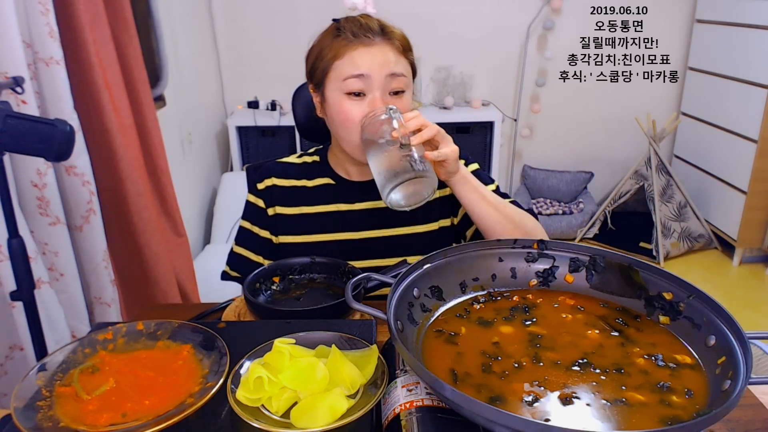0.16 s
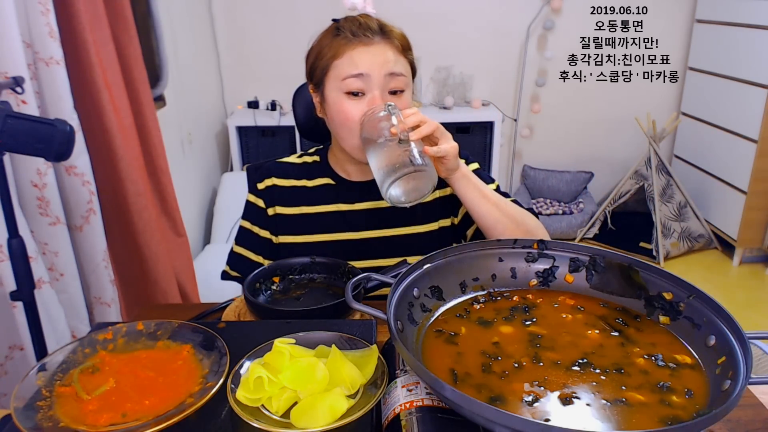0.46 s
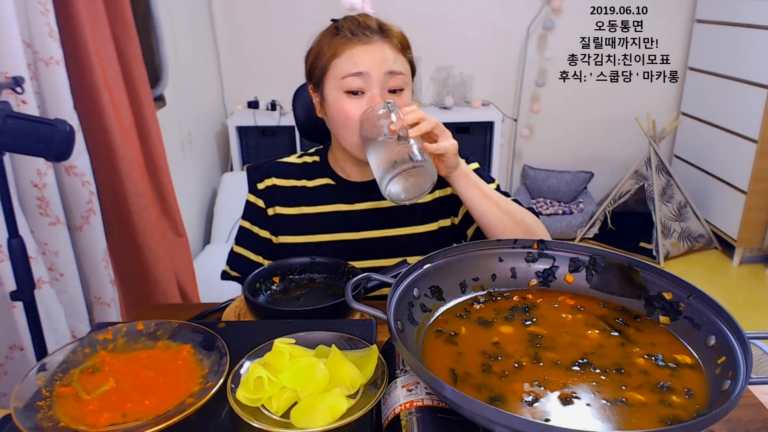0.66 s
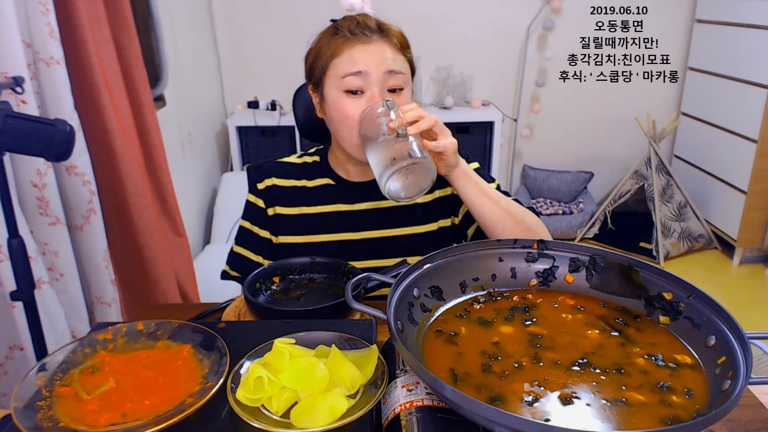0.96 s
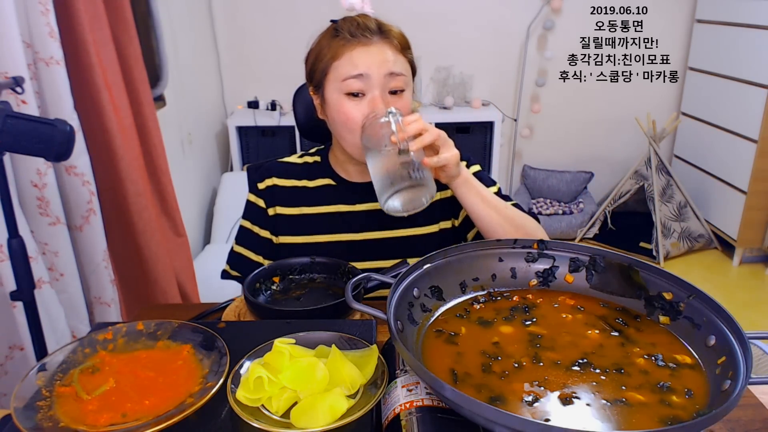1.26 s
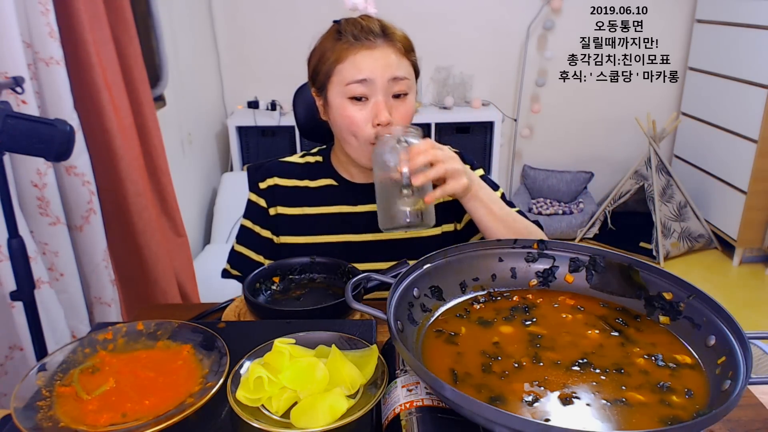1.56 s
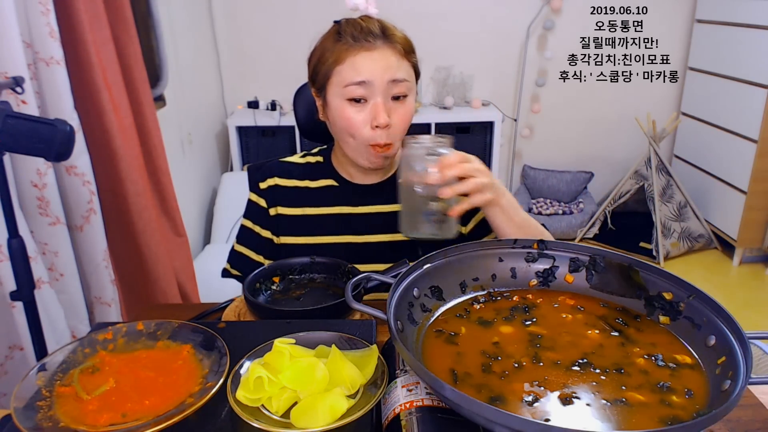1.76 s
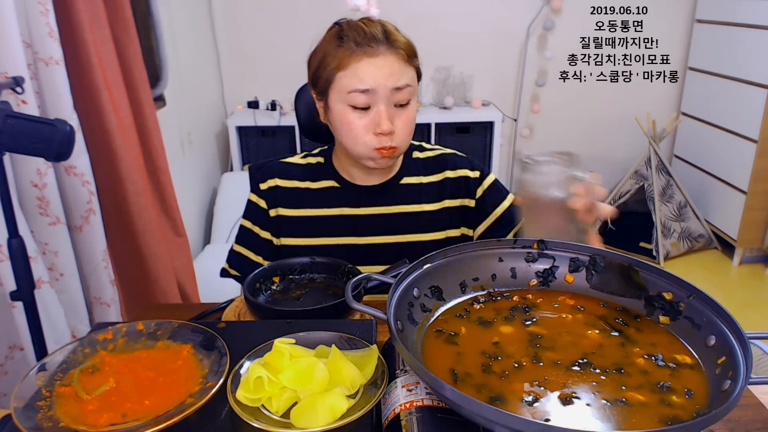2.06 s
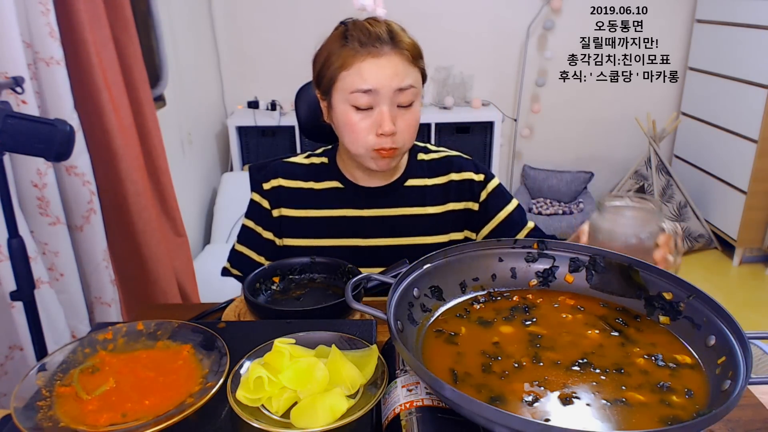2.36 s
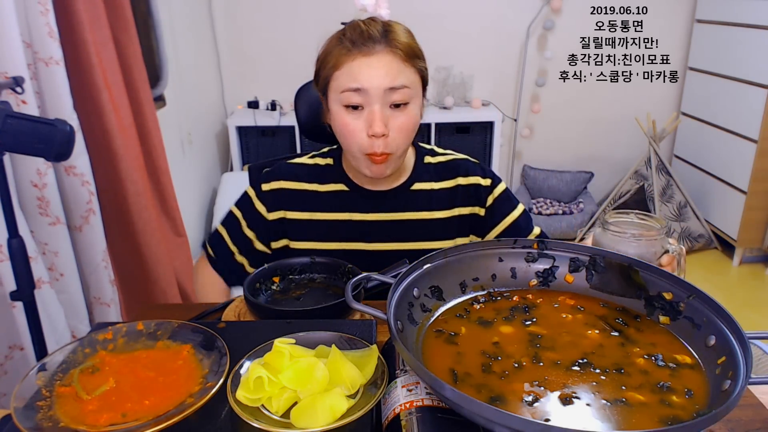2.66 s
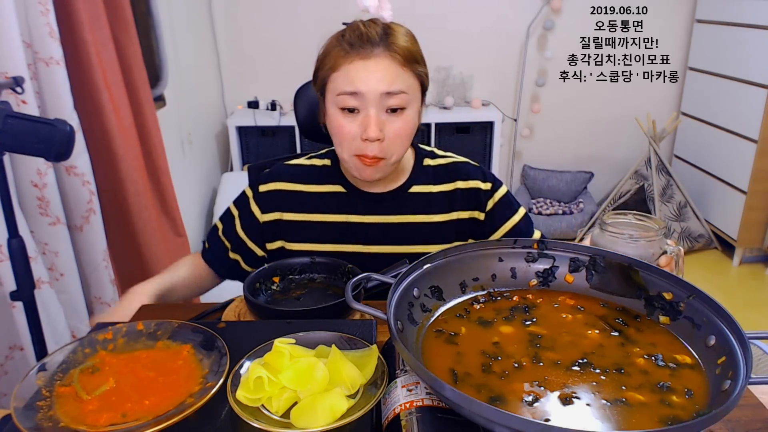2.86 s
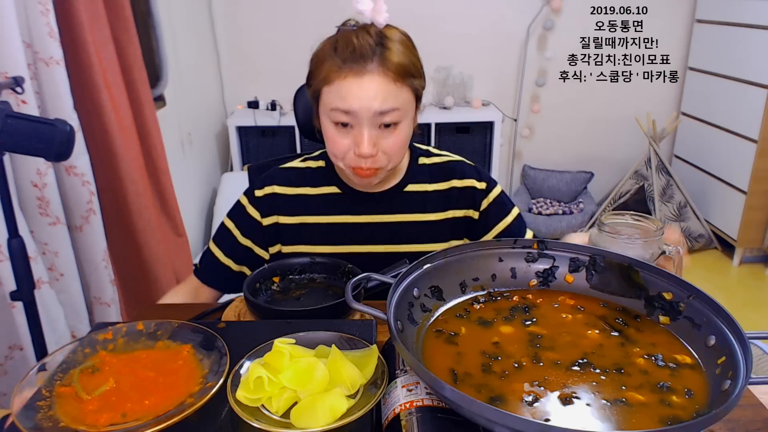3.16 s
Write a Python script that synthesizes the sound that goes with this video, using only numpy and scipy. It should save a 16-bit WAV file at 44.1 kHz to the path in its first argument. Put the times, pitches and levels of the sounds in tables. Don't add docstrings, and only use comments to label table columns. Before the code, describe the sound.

A glass mug holding ice, close and almost mono in a quiet small room with hiss and low fan hum. Ice cracks and slush shift at 0.2-0.45 s, then sparse faint ticks. Light clinks return at 1.2-1.6 s, brighter ones at 1.8-2.3 s. At 2.53 s the mug hits a wooden table, loud and booming with rattle, rocks at 2.67, then scrapes briefly at 2.75-3.1 with last small clinks.

```python
import sys
import numpy as np
from scipy import signal
from scipy.fft import rfft, irfft
from scipy.io import wavfile

SR = 44100
rng = np.random.default_rng(int(sys.argv[2]) if len(sys.argv) > 2 else 0)


def wrap_up_sound(samples):
    columns = np.atleast_2d(samples).T
    tamed = np.clip(columns, -1, 1)
    steps = np.round(tamed * 32767).astype(np.int16)
    wavfile.write(sys.argv[1], SR, steps)


def boost(x):
    u = np.asarray(x, float) / 20
    return 10 ** u


N = 145530

# pitch_hz, level_db per Hz
HISS_COLOUR = [(200, -53), (350, -3), (850, 2), (1700, -6), (3300, -9), (4800, -17), (6800, -16),
               (16000, -27.5)]
# pitch_hz, width_hz, level_db
FAN_HUMS = [(44.8, 5.8, -62.5), (135, 66, -66.5), (266.7, 26, -65), (311, 6.7, -67.5)]
# pitch_hz, time to fall 60 dB t60_s
ROOM_T60 = [(200, 0.42), (2000, 0.31), (10000, 0.18)]

# start_s, length_s, level_db
DRAGS = [
    (2.74, 0.38, -55),
    (2.778, 0.06, -62),
    (2.816, 0.008, -40.5),
    (2.823, 0.022, -37),
    (2.858, 0.01, -44),
    (2.867, 0.047, -41),
    (2.919, 0.016, -39),
    (2.94, 0.037, -54),
    (3.005, 0.073, -49.5),
]
# pitch_hz, level_db
DRAG_COLOUR = [(300, -18), (1140, -5.5), (1600, -14), (3000, -15.5), (4200, -23), (5100, -15.5),
               (6800, -18.5), (16000, -38)]

# start_s, level_db, dullness_db_per_khz, free ringing share (0 to 1)
KNOCKS = [
    (2.532, -1.5, 0, 1),
    (2.571, -14, -3, 0.35),
    (2.668, -11, -10, 0.49),
]
# start_s, level_db
BLOWS = [
    (2.5326, -.2),
    (2.5381, -7),
    (2.5413, -11),
    (2.668, -25),
]
TABLE_HZ = [76, 214, 262, 392, 430, 508, 581, 689, 815, 927, 1136, 1278, 1610, 2470]
# level_db, t60_s
TABLE_RINGS = [(-29.5, 0.2), (-29, 0.54), (-18.5, 0.11), (-27, 0.41), (-38.5, 0.65), (-20, 0.23),
               (-22, 0.23), (-29, 0.18), (-27, 0.3), (-37, 0.38), (-16.5, 0.13), (-10.5, 0.067),
               (-7, 0.029), (-34, 0.12)]
# pitch_hz, level_db per Hz
RATTLE_COLOUR = [(59, -54), (200, -13), (600, 3.5), (800, -4), (1600, -14), (3800, -32.5), (8000, -40),
                 (16000, -47)]
# pitch_hz, t60_s
RATTLE_T60 = [(100, 0.96), (500, 0.13), (2000, 0.23), (8000, 0.19)]

# start_s, level_db, pitch_hz, t60_s
CRACKS = [(.191, -28, 2640, .03), (.206, -22.5, 2600, 0.026), (.208, -14, 9260, 0.013),
          (.208, -23.5, 10500, 0.016), (.208, -16.5, 6940, 0.009), (.217, -23.5, 9420, 0.023),
          (.221, -29.5, 3160, 0.04), (.225, -39, 810, 0.027), (.242, -33, 760, 0.043),
          (0.251, -19, 6340, 0.017), (0.253, -22, 7590, 0.046), (.276, -19.5, 6350, 0.013),
          (1.226, -31, 2210, 0.026), (2.668, -26.5, 720, 0.058), (.955, -38, 2360, 0.076),
          (1.697, -40, 9600, 0.018), (1.697, -38, 6550, 0.017), (2.542, -34.5, 5150, 0.2),
          (1.758, -40, 6430, .02), (1.816, -22.5, 1050, 0.0062), (2.285, -30.5, 1010, 0.021),
          (3.019, -46, 7540, 0.017), (1.558, -44, 4120, 0.13), (1.5722, -44, 4220, 0.094),
          (1.89, -45.5, 4170, .05), (1.994, -42.5, 4100, 0.064), (1.612, -46, 2850, .02),
          (2.286, -42, 5900, 0.016), (2.285, -41, 2800, .015), (2.779, -34, 1112, 0.085),
          (2.817, -28.5, 1150, 0.024), (2.955, -42, 700, 0.051), (0.192, -36.5, 1015, 0.025),
          (0.205, -32, 1130, 0.025), (1.1444, -43, 3550, .03), (1.1444, -46, 7100, 0.04),
          (2.757, -34.5, 1300, 0.014), (3.017, -52, 5600, 0.013), (3.023, -47, 5400, 0.011),
          (3.029, -43, 6100, 0.011), (3.038, -43, 5560, 0.01), (3.05, -51, 5260, .012),
          (0.234, -39, 1800, 0.039), (.262, -30, 825, 0.017), (0.259, -34.5, 2790, 0.034)]
# start_s, length_s, level_db
SLUSH = [
    (.19, 0.17, -43.5),
]
# pitch_hz, level_db per Hz
SLUSH_COLOUR = [(180, -54), (300, -11), (774, -0.5), (1300, -4), (2650, -3.5), (4230, -11), (6300, -8.5),
                (16000, -15)]
# start_s, length_s, level_db
FIZZ = [
    (.335, 0.11, -56.5),
    (.387, 0.039, -48.5),
    (.422, 0.02, -49),
]

# start_s, first_ring_db, second_ring_db, high_rings_db
CLINKS_TIPPED = [(0.1727, -52.5, -69, -61), (0.191, -40, -37, -45), (0.2055, -36, -58, -45),
                 (0.274, -43, -42, -53), (0.304, -56, -63, -60), (0.3378, -46.5, -55, -52),
                 (0.3537, -52, -63, -46), (0.3697, -51, -55, -50), (0.3876, -47, -42, -60),
                 (0.4214, -51, -53, -53), (0.437, -47, -65, -65), (0.5164, -48.5, -77, -67),
                 (0.5565, -48, -66, -69), (.6635, -53, -66, -60), (.9363, -59, -43, -64),
                 (1.07, -49.5, -44, -58), (1.1444, -54, -49, -60), (1.2274, -43, -38, -49),
                 (1.28, -48.5, -41, -51), (1.3053, -47, -66, -67), (1.3264, -67, -47, -55),
                 (1.3625, -29.5, -35, -47), (1.3859, -40, -56, -56), (1.396, -40.5, -63, -64),
                 (1.4139, -45, -58, -59), (1.4435, -53, -60, -63), (1.479, -33, -41, -50),
                 (1.5378, -42, -47, -50.5), (1.5714, -49, -43, -50), (1.6295, -52.5, -46, -66)]
# start_s, first_ring_db, second_ring_db, high_rings_db
CLINKS_UPRIGHT = [(1.8053, -32, -38, -38), (1.826, -36, -57, -59), (1.8385, -39, -52, -58),
                  (1.8464, -40, -48, -65), (1.8834, -53, -43, -52), (1.921, -58, -62, -67),
                  (1.9445, -47, -54.5, -54), (1.9869, -45.5, -53, -51.5), (2.1236, -29, -24, -48),
                  (2.1544, -49, -46, -54), (2.1774, -47.5, -43, -56), (2.198, -58, -60, -52.5),
                  (2.2109, -34, -33.5, -48.5), (2.2408, -38.5, -47, -60), (2.2644, -42.5, -56, -54),
                  (2.507, -61, -71, -55), (2.5174, -50.5, -64, -66), (2.6234, -45, -60, -57.5),
                  (3.02, -40, -52, -62), (3.0784, -37.5, -42.5, -56.5), (3.1044, -49, -63, -72)]
# start_s, pitch_hz
TILT = [(0, 1810), (1.3, 1858), (1.37, 1916), (1.47, 1826), (1.85, 1869), (2.1, 1910), (3.3, 1930)]
# pitch_hz, level_db, t60_s
FIRST_RINGS = [(1930, 2, 0.067), (1974, -3.5, 0.021), (2530, -6.5, 0.016), (2784, -6, 0.014)]
# pitch_hz, level_db, t60_s
SECOND_RINGS = [(3564, -2, .055), (3640, -17, .04), (3865, -21, .05), (4200, -22, .07), (2820, -22, .05)]
# pitch_hz, level_db, t60_s
HIGH_RINGS = [(6550, 2.5, 0.017), (6170, -3.5, 0.022), (7560, -10, 0.019), (10500, -13, 0.028),
              (5400, -8, 0.016)]
RING_DB = [0, 6.5, 4.5]
SCATTER_DB = [4.5, 1, 4]


def evened(x):
    return x / np.sqrt(np.mean(x ** 2) + 1e-20)


def read(points, hz):
    f, value = np.transpose(points)
    return np.interp(np.log(hz + 1), np.log(f + 1), value)


def add(mix, s, sound):
    part = mix[round(s * SR):][:len(sound)]
    part += sound[:len(part)]


def colour(x, points):
    hz = np.fft.rfftfreq(len(x), 1 / SR)
    return evened(irfft(rfft(x) * boost(read(points, hz)), len(x)))


def ring(hz, db, t60, rise_s=0.00014):
    t = np.arange(SR // 2) / SR
    return boost(db - 60 * t / t60) * (1 - np.exp(-t / rise_s)) * np.sin(2 * np.pi * hz * t)


def fuzzy(hz, width, x):
    r = np.exp(-np.pi * width / SR)
    return evened(signal.lfilter([1, 0, -1], [1, -2 * r * np.cos(2 * np.pi * hz / SR), r * r], x))


def tail(t60s, x):
    hz, t, bands = signal.stft(x, SR, nperseg=128)
    decay = boost(-60 * t / read(t60s, hz)[:, None])
    return signal.istft(bands * decay, SR, nperseg=128)[1]


def bursts(rows, grit):
    out = np.zeros(N)
    for s, length, db in rows:
        u = np.arange(0, length, 1 / SR) / length
        stroke = np.sin(np.pi * u ** 0.41) ** 2
        add(out, s, boost(db) * stroke * grit[round(s * SR):][:len(u)])
    return out


def air():
    out = boost(-55.5) * colour(rng.standard_normal(N), HISS_COLOUR)
    for hz, width, db in FAN_HUMS:
        out = out + boost(db) * fuzzy(hz, width, rng.standard_normal(N))
    whine_hz, whine_db = 11220, -77
    drift = np.cumsum(rng.standard_normal(N)) / 50
    return out + boost(whine_db) * np.sin(2 * np.pi * whine_hz * np.arange(N) / SR + drift)


def room(x):
    echoes = np.zeros(SR // 2)
    at = np.arange(200, SR // 2 - 20, 20)
    echoes[at + rng.integers(0, 20, len(at))] = rng.choice([-1., 1.], len(at))
    decay = tail(ROOM_T60, echoes)
    return signal.fftconvolve(x, decay / np.linalg.norm(decay))[:N]


def drags():
    slips_per_s = 1100
    slips = rng.standard_normal(N) * (1 + 4 * (rng.random(N) < slips_per_s / SR))
    wood = fuzzy(1130, 37, slips)
    return bursts(DRAGS, colour(slips, DRAG_COLOUR) + boost(-15) * wood)


def blows():
    blow_hz, blow_s, sag_s = 1250, 0.0008, 0.0018
    t = np.arange(441) / SR
    swell = (t / blow_s * np.exp(1 - t / blow_s)) ** 2
    blow = swell * np.sin(2 * np.pi * blow_hz * sag_s * (1 - np.exp(-t / sag_s)))
    out = np.zeros(N)
    for s, db in BLOWS:
        add(out, s, boost(db) * blow)
    return out


def shaken_table():
    out, rise_s, rattle_db = np.zeros(N), 0.003, -15
    for s, db, dull_db, free in KNOCKS:
        for k, (hz, (mode_db, t60)) in enumerate(zip(TABLE_HZ, TABLE_RINGS)):
            tone = ring(hz, db + mode_db + dull_db * hz / 1000, t60 * free, rise_s=rise_s)
            add(out, s, (-1) ** k * tone)
        shake = [(hz, level + dull_db * hz / 1000) for hz, level in RATTLE_COLOUR]
        t60s = [(hz, t60 * free) for hz, t60 in RATTLE_T60]
        rattle = tail(t60s, colour(rng.standard_normal(SR // 2), shake))
        rise = 1 - np.exp(-np.arange(len(rattle)) / SR / rise_s)
        add(out, s, boost(db + rattle_db) * rattle * rise)
    return out


def cracks():
    out = np.zeros(N)
    for (s, db, hz, t60), luck in zip(CRACKS, rng.standard_normal((len(CRACKS), 3))):
        for z in luck:
            add(out, s, ring(hz * (1 + 0.0212 * z), db - 13.5, t60, rise_s=0.000087))
    grains = boost(1.5 * rng.exponential(1, N // 40 + 1)).repeat(40)[:N]
    grit = rng.standard_normal(N) * grains
    slush = bursts(SLUSH, colour(grit, SLUSH_COLOUR))
    fizz = bursts(FIZZ, fuzzy(12500, 1400, grit))
    return out + slush + fizz


def clinks():
    out, rows = np.zeros(N), CLINKS_TIPPED + CLINKS_UPRIGHT
    groups = (FIRST_RINGS, SECOND_RINGS, HIGH_RINGS)
    modes = [(g, *mode) for g, group in enumerate(groups) for mode in group]
    luck_rows = rng.standard_normal((len(rows), len(modes) + 2048))
    for (s, *dbs), luck in zip(rows, luck_rows):
        water_shift = np.interp(s, *np.transpose(TILT)) / FIRST_RINGS[0][0]
        for (g, hz, db, t60), z in zip(modes, np.clip(luck, -1.5, 1.5)):
            db += dbs[g] + RING_DB[g] + SCATTER_DB[g] * z
            if s < 1.9 and 3000 < hz < 3700:
                db -= 17
            sag = 0.96 if s < 1.75 and g == 2 else 1
            shift = water_shift if g == 0 else sag + 0.0035 * g * g * np.sin(7 * z)
            add(out, s, ring(hz * shift, db, t60, rise_s=0.001))
        tick = signal.lfilter([4, -1.5, 9, -7, -5, -13.5], [1], luck[-176:])
        add(out, s, boost(dbs[2] - 19 - np.linspace(0, 30, 176)) * tick)
        haze, haze_t60 = fuzzy(1970, 1350, luck[-2048:]), 0.095
        add(out, s, boost(dbs[1] - 18.5 - 60 * np.arange(2048) / SR / haze_t60) * haze)
    return out


def scene():
    table = blows() + shaken_table()
    mug = clinks() + cracks() + drags()
    mid = mug + table + boost(-9.5) * room(mug) + air()
    side = boost(-33) * table + boost(-30) * mug
    return np.array([mid - side, mid + side])


def band_limit(x):
    return signal.sosfilt(signal.butter(12, 16410, fs=SR, output="sos"), x)


def record(dry):
    duck_s, duck_length_s, edge_hz = 2.5247, 0.0042, 15950
    u = (np.arange(N) / SR - duck_s) / duck_length_s
    mute = np.clip(3 * np.sin(np.pi * np.clip(u, 0, 1)), 0, 1)
    ducked = dry * (1 - mute)
    edge = signal.firwin(511, edge_hz, window=("kaiser", 9), fs=SR)
    return band_limit(signal.oaconvolve(ducked, edge[None], "same"))


dry = scene()
out = record(dry)
wrap_up_sound(out)
```